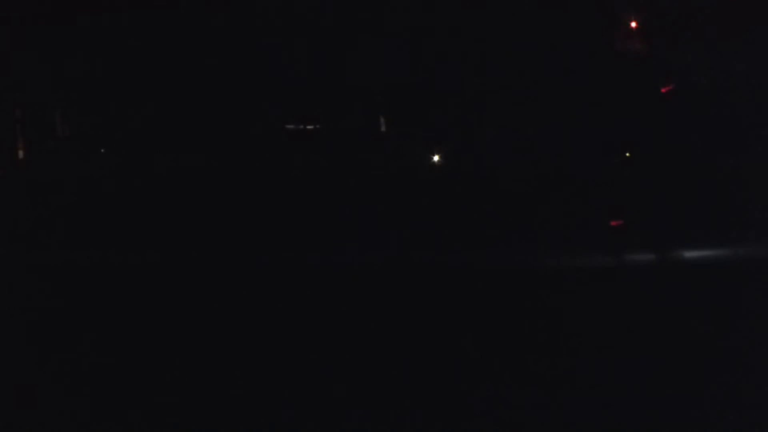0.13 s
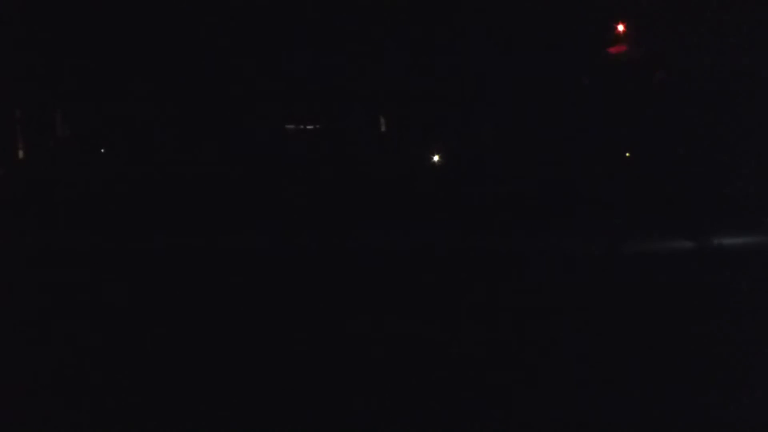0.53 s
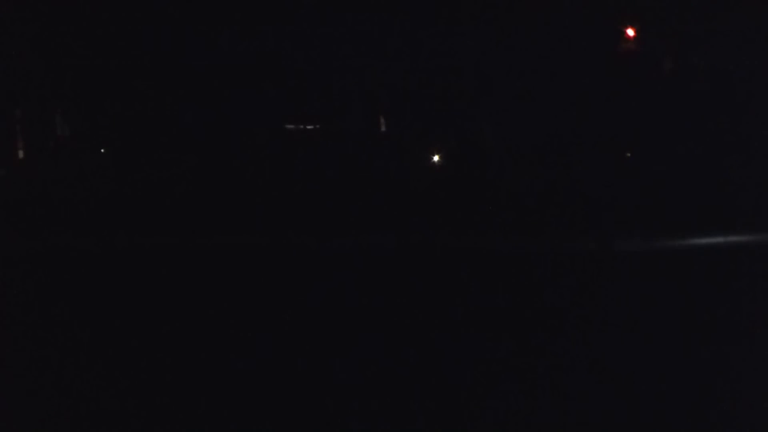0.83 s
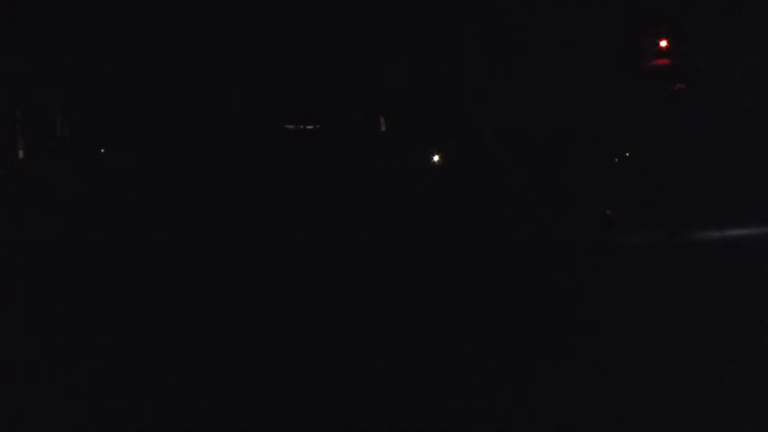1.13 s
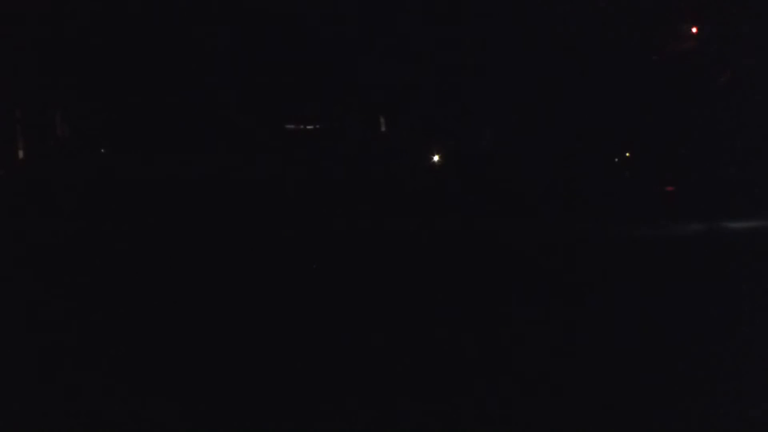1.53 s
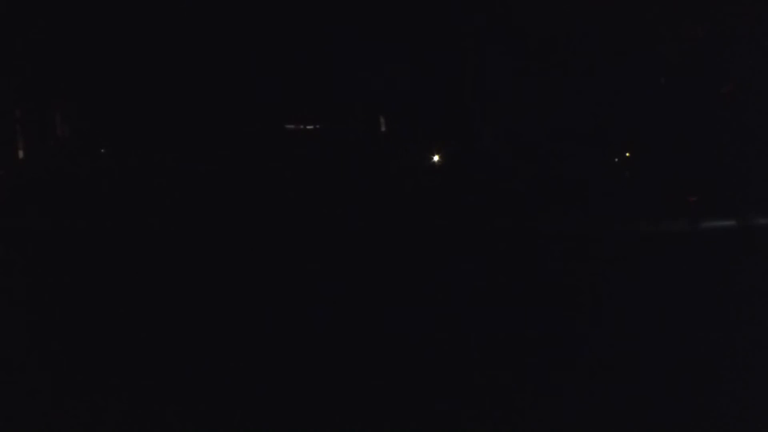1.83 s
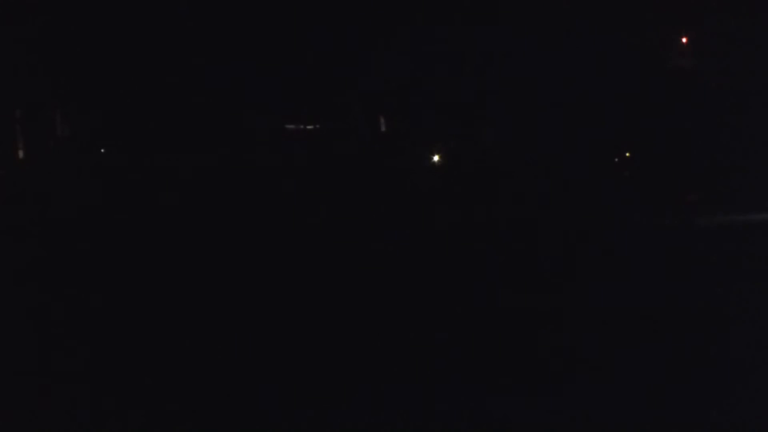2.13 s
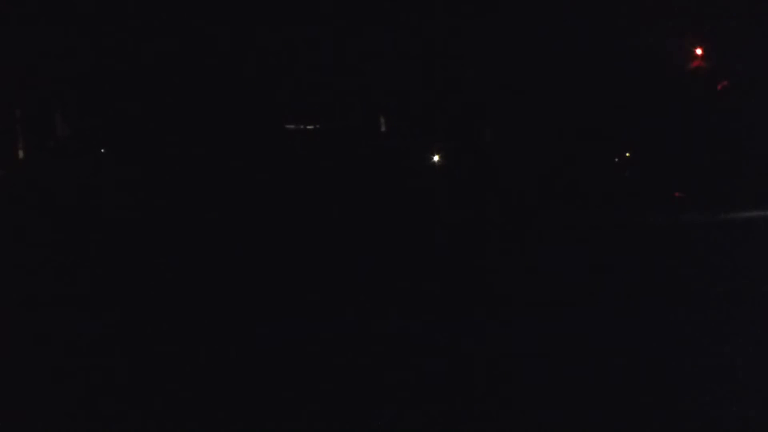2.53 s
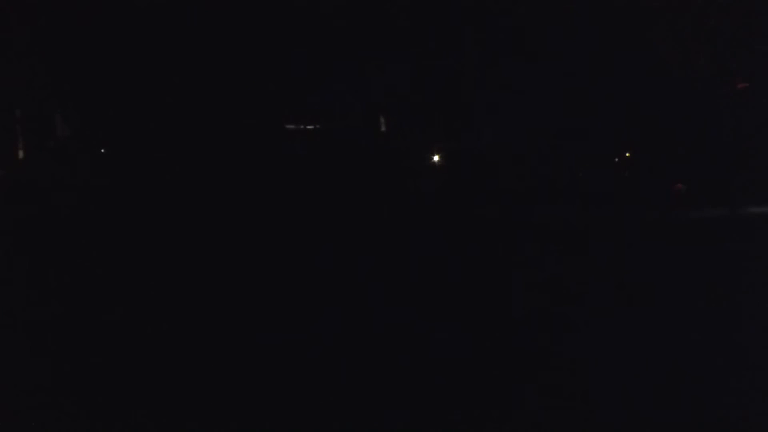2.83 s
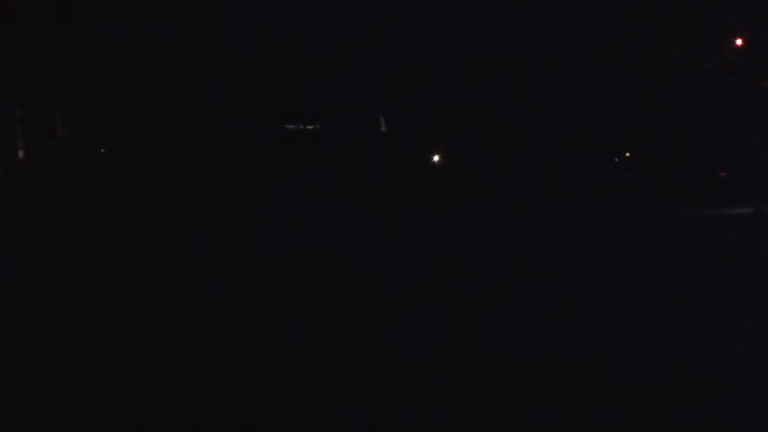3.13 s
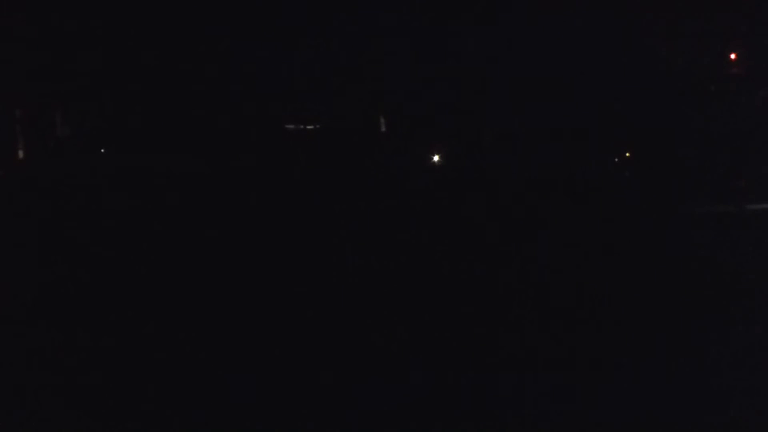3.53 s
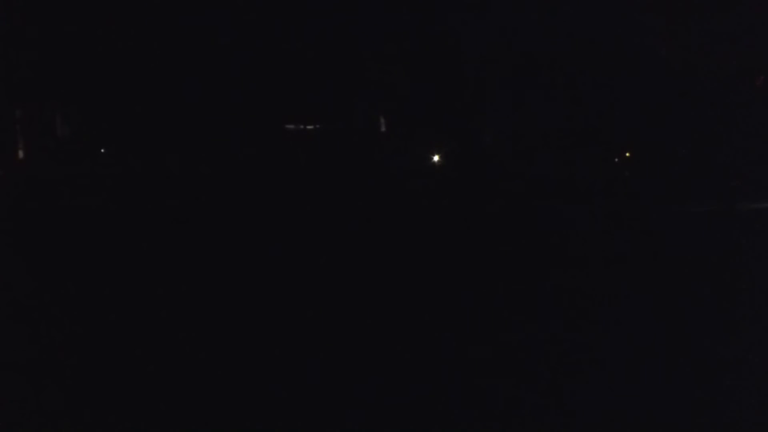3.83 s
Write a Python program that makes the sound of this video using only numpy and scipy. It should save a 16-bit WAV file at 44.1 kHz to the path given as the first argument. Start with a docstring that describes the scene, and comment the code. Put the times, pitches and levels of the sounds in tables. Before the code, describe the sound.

Low, lumpy wind thuds jump between left and right, far louder than the faint, crisp pole taps on pavement. After the gusts ease, distant traffic slowly swells under a light hiss in the open street.

```python
"""A pole taps the pavement on a night street, its main taps a little under a second apart.
Gusts buffet the two microphone ports, far louder than the taps, and ease in the last part.
Behind them distant traffic dips, then slowly grows louder, over a thin hiss.
Wind, traffic and hiss are filtered noise with changing levels, plus short swings for single puffs.
Each tap is a crunch of noise with a short ring, followed by street echoes."""
import sys
import numpy as np
from scipy import signal
from scipy.fft import rfft, irfft
from scipy.io import wavfile

SR = 44100
rng = np.random.default_rng(int(sys.argv[2]) if len(sys.argv) > 2 else 0)


def to_wav(sig):
    """Store sig (one row per channel, or 1-D mono) as 16-bit WAV at the path in sys.argv[1].

    Samples outside -1..1 are clipped; the rate is SR.
    """
    pcm = np.clip(np.atleast_2d(sig), -1, 1) * 32767
    pcm = np.round(pcm).astype(np.int16)
    wavfile.write(sys.argv[1], SR, pcm.T)  # frames by channels


N = 176400

# strength of the fast eddies, before each wind layer's own scaling: (time [s], level [dB])
EDDY_LEVEL = [(0.0, -75), (0.045, -56), (0.06, -70), (0.12, -37), (0.165, -52), (0.19, -42), (0.24, -49),
              (0.36, -47), (0.435, -41.5), (0.48, -38), (0.525, -30.5), (0.595, -40.5), (0.625, -30.5),
              (0.675, -51), (0.705, -39), (0.72, -42), (0.795, -33.5), (0.84, -42), (0.86, -36),
              (0.885, -45.5), (0.96, -36.5), (0.98, -45), (1.0, -36.5), (1.05, -35), (1.08, -50.5),
              (1.14, -42), (1.155, -62), (1.19, -41), (1.23, -54), (1.275, -43), (1.335, -35), (1.42, -43),
              (1.515, -44.5), (1.665, -75), (1.695, -58), (1.755, -50.5), (1.845, -62), (1.86, -45),
              (1.89, -49), (2.115, -50), (2.19, -55), (2.265, -77), (2.31, -34.5), (2.345, -40), (2.4, -58),
              (2.43, -35.5), (2.465, -35.5), (2.482, -42), (2.505, -37), (2.565, -84), (3.48, -75),
              (3.525, -70), (3.72, -80), (3.78, -54.5), (4.0, -60)]


def amp(db):
    """Turns decibels into a gain."""
    return 10 ** (np.asarray(db) / 20)


def unit(x):
    """Scales a sound to an rms (average strength) of 1."""
    return x / np.sqrt(np.mean(x ** 2) + 1e-20)


def at_hz(points, hz):
    """Reads a frequency table, joining its points on a log-frequency axis."""
    f, value = np.transpose(points)
    return np.interp(np.log(hz + 1), np.log(f + 1), value)


def curve(rows):
    """Reads a time table at every sample."""
    return np.interp(np.arange(N) / SR, *np.transpose(rows))


def add(mix, s, sound):
    """Mixes a sound in, starting at time s."""
    part = mix[..., max(round(s * SR), 0):][..., :sound.shape[-1]]
    part += sound[..., :part.shape[-1]]


def wander(rate_hz):
    """Smooth random drift of rms 1; movement faster than the given rate fades out."""
    hz = np.fft.rfftfreq(N, 1 / SR)
    spectrum = rfft(rng.standard_normal(N)) / (1 + (hz / rate_hz) ** 4)
    return unit(irfft(spectrum, N))


def lumpiness(depth_db, rate_hz):
    """Uneven gain of rms 1; the drift is clipped so that no lump gets extreme."""
    drift = np.clip(wander(rate_hz), -2, 1.5)
    return unit(amp(depth_db * drift))


def colour(x, spectrum, size=4096):
    """Filters a sound to the given spectrum; the filter has unit energy and never acts ahead of time."""
    hz = abs(np.fft.fftfreq(size, 1 / SR))
    log_gain = np.log(amp(at_hz(spectrum, hz)))
    # this phase puts the filter's energy as early as it can be
    response = np.exp(np.conj(signal.hilbert(log_gain)))
    taps = np.fft.ifft(response).real[:size // 2]
    taps = taps / np.linalg.norm(taps)
    return signal.oaconvolve(x, taps[None], axes=1)[:, :N]


def pair(same):
    """White noise in two channels: likeness 1 is equal, 0 unrelated, -1 opposite."""
    c = np.clip(at_hz(same, np.fft.rfftfreq(N, 1 / SR)), -.99, .99)
    noise = rfft(rng.standard_normal((2, N)))
    mid, side = noise * np.sqrt([(1 + c) / 2, (1 - c) / 2])
    return irfft(np.array([mid + side, mid - side]), N)


def ports(pan_db):
    """Left and right gains of constant power; pan_db is left minus right."""
    g = amp(np.array([[pan_db], [-pan_db]]) / 2)
    return g / np.sqrt(np.mean(g ** 2))


def hiss(level_db=3, flicker_db=1.0, flicker_hz=45):
    """Thin hiss: noise whose level flickers finely."""
    # spectrum below 2000 Hz: (frequency [Hz], level [dB per Hz])
    low_spectrum = [(20, -19), (900, -3)]
    # spectrum, of which only the part above 2000 Hz is used: (frequency [Hz], level [dB per Hz])
    high_spectrum = [(1290, -32), (2200, 0.5), (2740, 0.5), (3030, 0.5), (3260, -2), (3480, -5.5),
                     (4030, 2), (4410, 0.5), (5200, 4), (6480, 1.5), (7950, 2.5), (10700, 1), (14100, -4),
                     (15600, -10.5)]
    # left-right likeness: (frequency [Hz], likeness [-1..1])
    likeness = [(500, .5), (2000, 0.53), (4000, 0.79), (8000, 0.87), (12000, 0.84), (15000, .72)]
    # loudness before level_db and the flicker: (time [s], level [dB])
    loudness = [(0.0, -60), (0.05, -56.5), (0.07, -51), (0.09, -55), (0.13, -57), (0.34, -57), (0.51, -55),
                (0.63, -60), (0.69, -55.5), (0.75, -59), (0.78, -55.5), (0.82, -63.5), (0.87, -62),
                (0.9, -57.5), (1.02, -59.5), (1.19, -54.5), (1.2, -57.5), (1.43, -58), (1.45, -59),
                (1.59, -57.5), (1.68, -58), (1.78, -53.5), (1.8, -56.5), (1.99, -54), (2.02, -56.5),
                (2.25, -55), (2.36, -59), (4.0, -55.5)]
    spectrum = low_spectrum + [p for p in high_spectrum if p[0] > 2000]
    flicker = flicker_db * wander(flicker_hz)
    return colour(pair(likeness), spectrum) * amp(curve(loudness) + level_db + flicker)


def traffic(swell_db=1.5, swell_hz=29):
    """Roar of distant traffic: mostly low noise whose level trembles slightly."""
    # (frequency [Hz], level [dB per Hz])
    spectrum = [(20, 14), (60, -2), (130, 10.5), (250, -2.5), (450, -1), (850, -1), (1300, -6.5),
                (2000, -15), (3200, -15.5), (6000, -22), (15000, -50)]
    # left-right likeness: (frequency [Hz], likeness [-1..1])
    likeness = [(50, 0.17), (300, 0.91), (650, 0.9), (1000, 0.59), (1500, 0.16), (2500, 0.91), (8000, .6)]
    # loudness before the trembling: (time [s], level [dB])
    loudness = [(0, -50), (.8, -58), (1.6, -54.5), (2, -53), (2.55, -53), (2.8, -48.5), (3.3, -48),
                (4, -48.5)]
    return colour(pair(likeness), spectrum) * amp(curve(loudness) + swell_db * wander(swell_hz))


def tyres():
    """Tyre noise of the traffic: bright noise, slightly stronger on the right."""
    # (frequency [Hz], level [dB per Hz])
    spectrum = [(20, -44), (1000, -1), (2400, 4.5), (3400, 3), (4800, 9.5), (7000, 2), (10000, 1),
                (16000, -6)]
    # left-right likeness: (frequency [Hz], likeness [-1..1])
    likeness = [(1000, 0.57), (4000, 0.73), (10000, 0.36)]
    # loudness before panning: (time [s], level [dB])
    loudness = [(0, -61.5), (1.6, -79), (1.9, -59), (2.5, -67.5), (3.1, -60.5), (3.55, -56.5), (4, -55)]
    return colour(pair(likeness), spectrum) * amp(curve(loudness)) * ports(pan_db=-1.5)


def buffeting(level_db=-2, lumpy_db=3.5, lump_hz=70):
    """Lumpy low pressure swings, each port catching its own share of the gust."""
    # (frequency [Hz], level [dB per Hz])
    spectrum = [(20, -25), (42, -46), (65, -30.5), (100, -10), (150, 0), (220, 1.5), (320, -4),
                (450, -17.5), (650, -28), (1000, -39), (2000, -70), (6000, -94)]
    # left-right likeness: (frequency [Hz], likeness [-1..1])
    likeness = [(60, 0.12), (200, 0.43), (400, 0.097), (800, 0)]
    # wind pressure on the left port, before level_db: (time [s], level [dB])
    left = [(0.0, -18.5), (0.03, -24), (0.06, -50), (0.105, -21), (0.135, -36), (0.255, -22), (0.39, -32.5),
            (0.435, -26.5), (0.465, -25.5), (0.525, -16.5), (0.675, -23), (0.78, -18), (0.93, -22),
            (1.035, -13), (1.065, -26), (1.14, -23), (1.245, -29.5), (1.35, -16.6), (1.365, -29),
            (1.41, -17.5), (1.455, -29), (1.485, -20), (1.635, -46.5), (1.815, -23), (1.905, -37),
            (1.935, -18), (2.07, -22), (2.1, -24.5), (2.205, -16.5), (2.25, -59), (2.28, -25),
            (2.325, -15.5), (2.34, -21.5), (2.46, -19), (2.565, -22.5), (2.58, -38.5), (2.73, -39),
            (2.76, -55), (2.91, -42.5), (2.97, -52), (3.09, -57), (3.12, -27), (3.22, -51), (3.41, -59),
            (3.435, -30), (3.51, -28), (3.63, -28), (3.655, -42), (3.78, -20.5), (3.81, -28), (3.85, -18.5),
            (3.875, -29.5), (3.9, -22.5), (4.0, -26)]
    # wind pressure on the right port, before level_db: (time [s], level [dB])
    right = [(0.0, -27), (0.075, -34.5), (0.12, -17), (0.165, -26.5), (0.225, -11), (0.255, -25.5),
             (0.315, -18.5), (0.375, -20), (0.57, -21.5), (0.63, -18), (0.66, -31), (0.78, -24.5),
             (0.795, -12.5), (0.885, -27.5), (0.99, -22), (1.215, -16), (1.23, -26.5), (1.275, -15),
             (1.365, -25), (1.395, -25.5), (1.455, -24), (1.605, -28), (1.665, -42), (1.68, -31.5),
             (1.71, -31.5), (1.845, -22), (2.01, -36), (2.04, -26.5), (2.115, -28), (2.145, -30),
             (2.205, -33), (2.25, -62), (2.31, -23), (2.37, -19), (2.4, -44), (2.43, -23), (2.505, -26),
             (2.655, -46), (2.7, -36), (2.805, -61), (3.12, -43.5), (3.36, -66), (3.51, -24.5),
             (3.9, -42.5), (3.93, -25), (4.0, -52)]
    lumps = np.array([lumpiness(lumpy_db, lump_hz) for _ in range(2)])
    gusts = np.array([curve(left), curve(right)])
    return colour(pair(likeness), spectrum) * lumps * amp(level_db + gusts)


def flutter(level_db=7, lumpy_db=5.5, lump_hz=120):
    """Small eddies in the strong gusts, at many pitches pushing one port while they pull the other."""
    # (frequency [Hz], level [dB per Hz])
    spectrum = [(30, -56), (150, -8.5), (280, -13.5), (380, 5), (500, 1), (700, -2), (1000, -12),
                (1500, -22), (2100, -45), (3000, -67), (8000, -59)]
    # left-right likeness, limited to -0.99 when read: (frequency [Hz], likeness)
    likeness = [(150, -0.48), (350, 0.29), (600, -0.89), (1200, -0.92), (2200, -1.7)]
    lumps = lumpiness(lumpy_db, lump_hz)
    return colour(pair(likeness) * lumps, spectrum) * amp(curve(EDDY_LEVEL) + level_db)


def roar(level_db=-32, full_gust_db=-32, growth=1.8, lumpy_db=-1.0, lump_hz=140):
    """A rougher roar that grows faster than the gust and so shows mainly at its height."""
    # (frequency [Hz], level [dB per Hz])
    spectrum = [(30, -28), (150, -13), (330, -2.5), (480, 2), (700, -7.5), (1000, -13.5), (1500, -22),
                (2100, -33.5), (3500, -61), (8000, -66)]
    # left-right likeness: (frequency [Hz], likeness [-1..1])
    likeness = [(200, .2), (500, 0.46), (1200, -0.2), (2300, .5)]
    lumps = lumpiness(lumpy_db, lump_hz)
    # one dB of extra eddy strength gives `growth` dB of extra roar
    gust_db = level_db + growth * (curve(EDDY_LEVEL) - full_gust_db)
    return colour(pair(likeness) * lumps, spectrum) * amp(gust_db)


def puffs(level_db=-5.0, swings=0.29, cut_hz=75):
    """A large eddy crosses a port: a brief swing of suction and pressure, slower when the eddy is wide."""
    # single puffs, level before level_db and the bass cut:
    # (time of the middle [s], level [dB], left minus right [dB], swing rate [Hz])
    puff_list = [(0.117, -9.5, -30, 275), (0.146, -7, -26, 264), (0.188, -4.5, -26, 330),
                 (0.221, -8, -26, 260), (0.312, -14, -22, 208), (0.467, -8.5, 20, 282),
                 (0.488, -10, 6, 306), (0.52, -9, 22, 277), (0.533, -7, 14, 250), (0.568, -11, 15, 257),
                 (0.621, -6, -18, 365), (0.773, -12, 24, 320), (0.801, -7.5, -29, 280),
                 (0.845, -17.5, -7, 210), (0.858, -13, 22, 318), (0.943, -9, 26, 241),
                 (0.956, -9.5, 16, 255), (0.97, -9, 15, 224), (1.03, -4.5, 20, 225), (1.046, -13, -16, 372),
                 (1.126, -20, -10, 248), (1.183, -7.5, -19, 269), (1.207, -6.5, -24, 287),
                 (1.281, -7, -24, 264), (1.306, -9.5, -15, 280), (1.345, -6.5, 19, 260),
                 (1.402, -14.5, 22, 258), (1.48, -13.5, 17, 270), (1.603, -17.5, -14, 230),
                 (1.685, -12, -20, 243), (1.792, -12.5, 14, 267), (1.814, -14, 19, 222),
                 (2.029, -16.5, 20, 228), (2.064, -9, 27, 233), (2.175, -16.5, 16, 215),
                 (2.196, -21, 19, 216), (2.319, 0, 15, 240), (2.35, -17, 8, 170), (2.388, -13, 12, 280),
                 (2.416, -10.5, 15, 236), (2.442, -4.5, 19, 229), (2.462, -3, 22, 337), (2.5, -14, 14, 303),
                 (2.519, -13.5, 18, 287), (2.543, -18, 31, 225), (2.908, -30, 1, 184),
                 (2.974, -30.5, 6, 183), (3.124, -19.5, 16, 206), (3.379, -27.5, 16, 219),
                 (3.433, -25, 10, 220), (3.501, -19, 12, 220), (3.568, -15.5, 16, 190),
                 (3.683, -25, 10, 218), (3.734, -17, 14, 237), (3.774, -14.5, 19, 250),
                 (3.785, -11.5, 20, 254), (3.861, -16, 23, 241), (3.906, -11, 26, 240),
                 (3.971, -16, 23, 218)]
    out = np.zeros((2, N))
    t = np.arange(-SR // 100, SR // 100) / SR
    for s, db, pan_db, hz in puff_list:
        bump = np.exp(-(hz * t / swings) ** 2 / 2)
        swing = np.sin(2 * np.pi * hz * t) * bump
        add(out, s + t[0], ports(pan_db) * amp(db + level_db) * swing / swing.max())
    return signal.sosfilt(signal.butter(2, cut_hz, "highpass", fs=SR, output="sos"), out)


def slaps(decay_s=0.0029, level_db=-6):
    """Brief dull cracks where a gust breaks, pushing one port and pulling the other."""
    # single slaps, level before level_db: (time [s], level [dB], left minus right [dB])
    slap_list = [(0.094, -37, -12), (0.116, -39, -7), (0.127, -35, -8), (0.183, -18, -6.5),
                 (0.187, -21.5, -3), (0.22, -33, -4), (0.257, -33.5, -5), (0.278, -27.5, -5),
                 (0.308, -30.5, -5.5), (0.354, -27.5, -4.5), (0.391, -33, -8), (0.454, -35, -6),
                 (0.466, -31, 5), (0.495, -22, 4), (0.512, -24.5, 7), (0.524, -19, 3), (0.555, -32, -7),
                 (0.617, -28, 0), (0.703, -36, 8), (0.762, -31, 6), (0.78, -26, 4.5), (0.79, -34, 0.5),
                 (0.826, -37, 4), (0.856, -28.5, 4.5), (0.869, -33, 11), (0.939, -39, 6), (0.956, -36, 5.5),
                 (0.964, -36, 6), (0.995, -35, -3), (1.017, -33, 8), (1.029, -26.5, -5),
                 (1.045, -20.5, -6.5), (1.179, -22, -4.5), (1.208, -30.5, -6.5), (1.28, -36.5, -6),
                 (1.295, -36, -6), (1.329, -31, -1), (1.345, -38, 4), (1.356, -40, 6), (1.385, -32, 8),
                 (1.426, -32, 5), (1.505, -32, -5.5), (1.862, -36, -7), (2.035, -37, 4), (2.07, -33, 6),
                 (2.116, -31, 3), (2.319, -33, 5.5), (2.341, -28.5, 5.5), (2.379, -34, 6), (2.431, -30, 4),
                 (2.441, -38, 3.5), (2.461, -25, 7), (2.498, -29, 6), (2.508, -34, 7)]
    # (frequency [Hz], level [dB per Hz])
    spectrum = [(60, -40), (300, 0.5), (480, 9), (750, 3.5), (1100, -3.5), (1600, -11.5), (2100, -23),
                (2800, -33), (4000, -46), (8000, -53)]
    out = np.zeros((2, N))
    t = np.arange(SR // 50) / SR
    for s, db, pan_db in slap_list:
        burst = np.exp(-t / decay_s) * rng.standard_normal((1, len(t)))
        crack = unit(colour(burst, spectrum)[0, :len(t)])
        add(out, s, ports(pan_db) * amp(db + level_db) * np.array([-crack, crack]))
    return out


def scrapes(grains_per_s=700):
    """The tip drags over loose grit: random clicks that die away and are then filtered."""
    # single drags, level before filtering: (time [s], level [dB], decay [s])
    drag_list = [(0.173, -44.5, .02), (1.785, -51.5, 0.061), (3.455, -50, 0.087)]
    # (frequency [Hz], level [dB per Hz])
    spectrum = [(200, -16), (1500, 3), (2400, 5), (3300, -1.5), (4800, 5), (6500, -1), (9000, -25),
                (16000, -25)]
    out = np.zeros(N)
    t = np.arange(SR // 3) / SR
    for s, db, decay_s in drag_list:
        grains = rng.standard_normal(len(t)) * (rng.random(len(t)) < grains_per_s / SR)
        add(out, s, amp(db) * np.exp(-t / decay_s) * unit(grains))
    return colour(out[None], spectrum)


def pole(rise_s=.0003, decay_s=.0016, tip_q=2.0, shaft_hz=5000, shaft_t60_s=0.06, shaft_db=-22):
    """Each contact is a short crunch of grit, a damped ring of the tip and a faint ring of the shaft."""
    # the tip lands, skips and scuffs; grit level is relative to the ring and set before filtering:
    # (time [s], ring level [dB], ring pitch [Hz], grit level [dB])
    contacts = [(.0508, -33.5, 5660, -9.5), (0.0827, -28.5, 3740, -16), (0.086, -27, 3650, -19),
                (.3995, -42, 5770, -2), (.461, -40, 5100, -8), (0.904, -33.5, 5000, -12),
                (.908, -42, 5100, 1), (0.914, -42, 5200, -3), (1.072, -43, 4940, 3.5),
                (1.129, -42, 2600, -6), (1.186, -46, 7850, -19), (1.282, -43.5, 9000, 0),
                (1.772, -33.5, 5700, -14), (1.779, -39, 7800, -17), (1.7842, -42, 2400, -9),
                (1.7855, -38, 2380, 4), (1.866, -41.5, 2240, -16), (2.521, -44, 4900, -6),
                (2.5392, -38, 4730, -3), (2.542, -36, 4670, -18), (2.684, -38.5, 2230, -15),
                (2.694, -41, 2050, -19), (3.433, -33.5, 4900, -12), (3.458, -39, 6200, -18),
                (3.47, -44, 5000, -12), (3.495, -43, 4970, -5)]
    # spectrum of the crunch: (frequency [Hz], level [dB per Hz])
    grit_spectrum = [(100, -18), (1300, -8), (2300, 11), (3200, 3), (4500, 1), (6500, -11), (8000, -18),
                     (12000, -4), (16000, -13)]
    ring, grit = np.zeros(N), np.zeros(N)
    t = np.arange(SR // 8) / SR
    blow = (1 - np.exp(-t / rise_s)) * np.exp(-t / decay_s)
    for s, db, hz, grit_db in contacts:
        tip_noise, grit_noise = rng.standard_normal((2, len(t)))
        # tip_q is pitch over width: a low value gives a broad, blurred ring
        mode = signal.iirpeak(hz, tip_q, fs=SR)
        tip = blow * signal.lfilter(*mode, signal.lfilter(*mode, tip_noise))
        tip = tip * np.linalg.norm(blow) / np.linalg.norm(tip)
        # the shaft answers a tip that rings near its pitch
        near = 1 / (1 + (2 * tip_q * (hz / shaft_hz - 1)) ** 2)
        shaft_fade = amp(shaft_db - 60 * t / shaft_t60_s)
        shaft = near * shaft_fade * np.sin(2 * np.pi * shaft_hz * t)
        add(ring, s, amp(db) * (tip + shaft))
        add(grit, s, amp(db + grit_db) * blow * grit_noise)
    return ring + colour(grit[None], grit_spectrum)


def street(x, t60_s=0.26, echo_db=-10, echoes_per_s=2000):
    """Thin scattered echoes from the road and house fronts, fading by 60 dB in t60_s."""
    t = np.arange(SR // 2) / SR
    hits = rng.random((2, len(t))) < echoes_per_s / SR
    tail = rng.standard_normal((2, len(t))) * hits * amp(-60 * t / t60_s)
    # each side also gets half of the other side's echoes
    tail = tail + tail[::-1] / 2
    tail = tail / np.linalg.norm(tail[0])
    return x + amp(echo_db) * signal.fftconvolve(x, tail, axes=1)[:, :N]


def scene():
    """Traffic and hiss behind, wind on the microphone ports, and the pole echoing in the street."""
    background = hiss() + traffic() + tyres()
    wind = buffeting() + flutter() + roar() + puffs() + slaps()
    return background + wind + street(pole() + scrapes())


def record(dry, bass_cut_hz=62, edge_hz=15700):
    """The recorder's bass cut and its upper frequency limit."""
    cut = signal.sosfilt(signal.butter(4, bass_cut_hz, "highpass", fs=SR, output="sos"), dry)
    band_limit = signal.firwin(511, edge_hz, window=("kaiser", 9), fs=SR)
    return signal.oaconvolve(cut, band_limit[None], "same")


dry = scene()
out = record(dry)
to_wav(out)
```